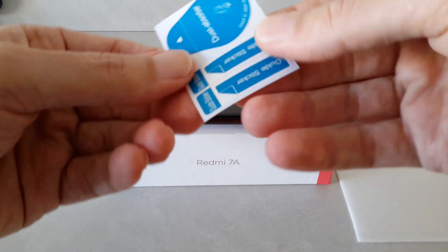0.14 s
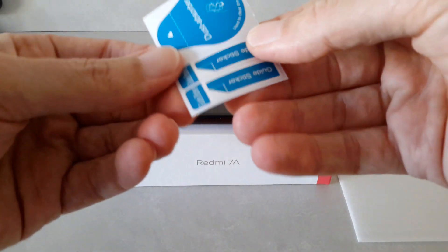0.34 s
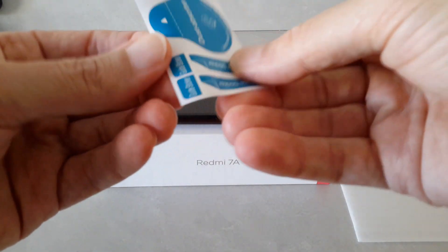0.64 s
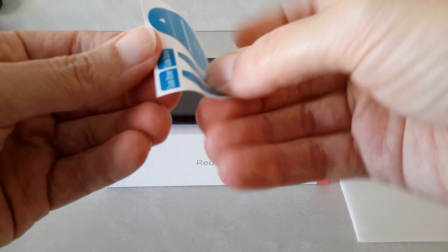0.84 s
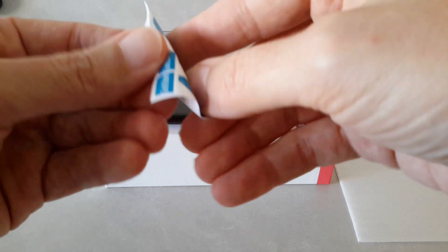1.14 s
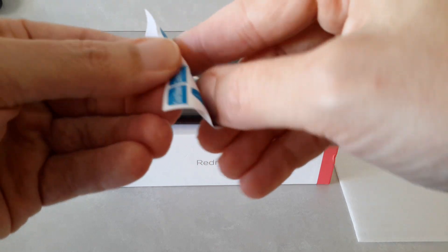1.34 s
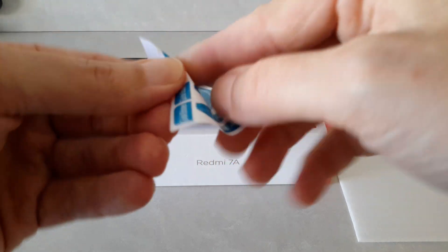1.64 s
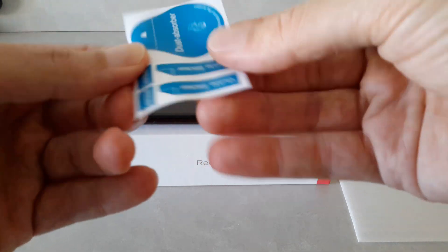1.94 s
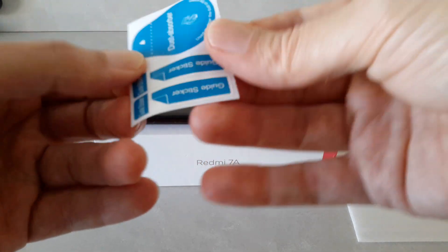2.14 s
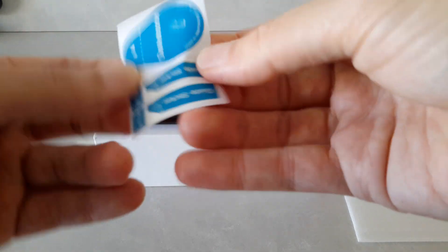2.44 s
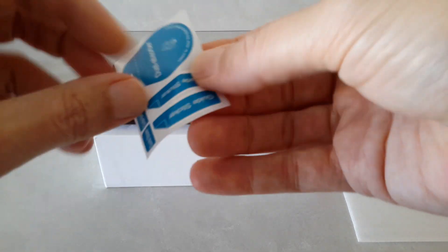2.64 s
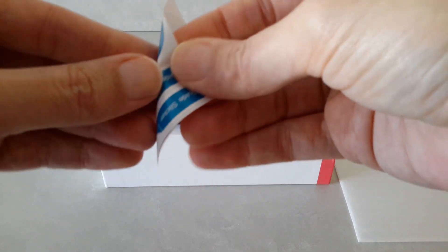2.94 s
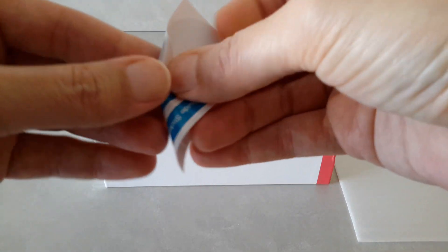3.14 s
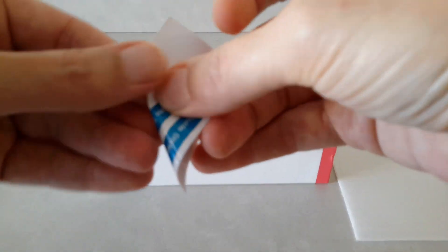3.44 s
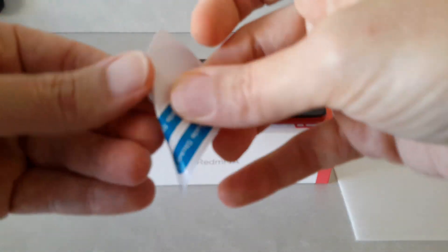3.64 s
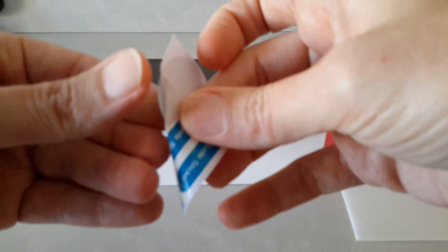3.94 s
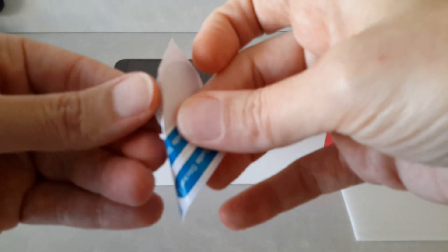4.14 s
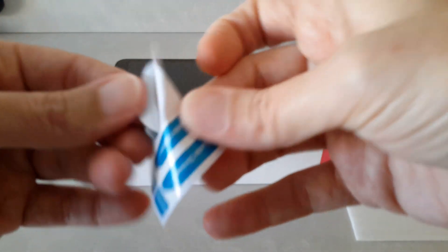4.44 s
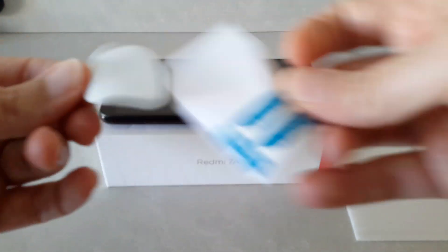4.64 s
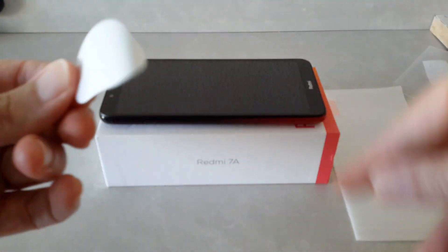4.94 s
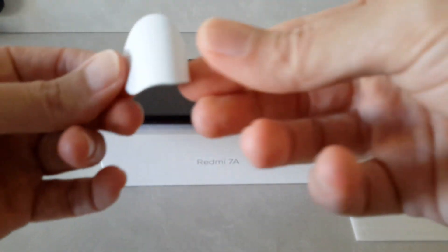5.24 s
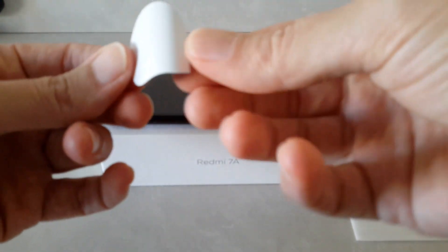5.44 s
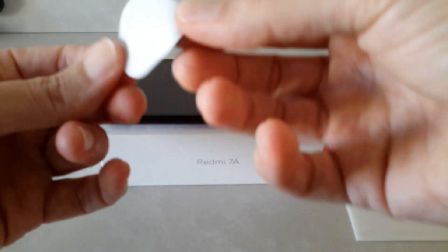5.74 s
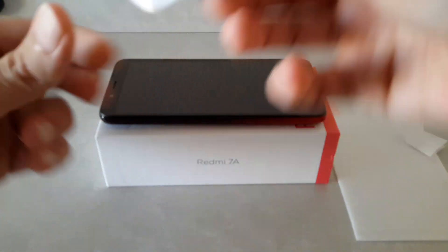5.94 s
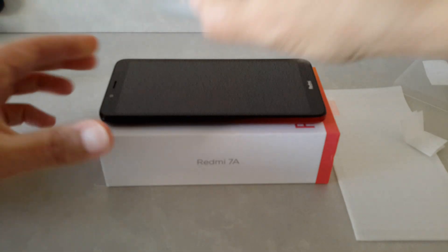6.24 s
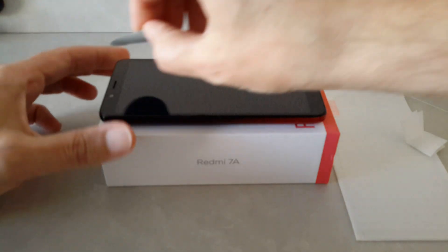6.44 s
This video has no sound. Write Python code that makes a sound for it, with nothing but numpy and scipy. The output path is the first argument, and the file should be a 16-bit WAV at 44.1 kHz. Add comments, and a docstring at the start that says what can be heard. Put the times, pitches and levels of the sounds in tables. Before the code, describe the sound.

Fingers rub and flex a small stiff sticker sheet with faint rustles and crisp ticks over a low fan drone, then one hard snap echoes.

```python
"""From the start a fan drones in the low resonances of a bare, echoing room, over soft microphone hiss
and an uneven low rumble, whose upper boom is stronger near the end.
Soon skin rubs a sticker sheet near the microphone: jerky noise that swells and fades with each stroke.
Fingertips tap softly (one short fading tone each), then bending creases tick: a jolt and a dying flurry.
About five seconds in, something small and hard snaps once on the table: many fading tones and a crack.
The rubbing, taps, ticks and snap also echo from the room."""
import sys
import numpy as np
from scipy import signal
from scipy.fft import rfft, irfft, next_fast_len
from scipy.io import wavfile
from scipy.ndimage import map_coordinates

SR = 44100
rng = np.random.default_rng(int(sys.argv[2]) if len(sys.argv) > 2 else 0)


def log_audio(samples):
    """Write samples as a 16-bit WAV file to the path given in sys.argv[1]."""
    # one column per channel
    frames = np.atleast_2d(samples).T
    # limit to full scale, then quantise
    limited = np.clip(frames, -1, 1)
    pcm = np.round(limited * 32767).astype(np.int16)
    wavfile.write(sys.argv[1], SR, pcm)


N = 290568

# Tone colour of the steady background noise, low fan air and microphone hiss:
# (frequency [Hz], level per Hz [dB])
STEADY_NOISE_COLOUR = [(70, -28.5), (150, -8.5), (300, -1.5), (450, -4), (700, -6), (1250, -11.5),
                       (1800, -19), (2600, -25), (3500, -28), (5000, -31), (6500, -40), (8500, -42),
                       (15800, -44.5)]
# Low room resonances that drone with the fan: (frequency [Hz], width [Hz], level [dB])
DRONE_RESONANCES = [(48, 14, -24), (110, 50, -13.5), (195.5, 40, -8), (234.3, 19, -5.5), (269.6, 29, -7.5),
                    (292.3, 34, -8), (336.6, 22, -8.5), (382, 37, -15.5), (470, 74, -20.5)]
# Steady fan and motor tones: (frequency [Hz], peak level [dB])
HUM_TONES = [(268.5, -57), (578, -67)]
# Rough levels of the low rumble: (time [s], upper boom level [dB], deep boom level [dB])
RUMBLE_LEVELS = [(0.0, -63.5, -79), (0.8, -65, -69), (4.0, -64.5, -73.5), (4.8, -62.5, -71),
                 (5.14, -52.5, -70), (5.35, -63, -65), (6.0, -58, -69), (6.35, -62, -66),
                 (6.59, -54, -66.5)]

# Skin strokes: (middle [s], length [s], level [dB], dull scrape relative to the stroke [dB])
STROKES = [(.14, .078, -75.5, -16), (.385, .12, -75.5, -14), (0.762, .064, -73.5, -12),
           (0.89, 0.12, -70, -20), (1.158, 0.048, -75.5, -8), (1.602, .061, -77, 6),
           (1.76, .095, -70.5, -7), (1.866, 0.13, -63, -13), (1.964, 0.049, -60, 0), (2.301, .07, -64.5, 7),
           (2.44, 0.42, -74, 4), (2.626, .1, -69.5, 4), (2.856, .068, -71.5, -4), (3.0, .1, -74, -15),
           (3.09, 0.088, -69.5, -16), (3.18, .097, -69, -12), (3.255, .14, -67, -16),
           (3.379, .045, -67, -2), (3.47, .17, -77, -6), (3.622, .077, -72.5, 5.5),
           (3.824, 0.054, -62.5, -1), (4.354, .047, -76.5, -3), (4.738, 0.08, -71, 2),
           (4.812, 0.11, -63.5, 5.5), (4.97, 0.31, -67.5, 5), (6.06, 0.055, -63, 0), (6.4, .36, -77, 7.5)]
# Tone colour of skin on paper: (frequency [Hz], level [dB])
PAPER_COLOUR = [(2200, -27), (3300, -11), (3900, -7.5), (4500, -2.5), (5100, -2), (5700, -5), (6500, -10),
                (7200, -18), (9000, -52.5)]
# Tone colour of the thin hiss in a stroke: (frequency [Hz], level [dB])
HISS_COLOUR = [(5000, -36.5), (7500, 1), (10000, -8.5), (12500, -10), (15500, -21)]
# Tone colour of the dull scrape in a stroke: (frequency [Hz], level [dB])
DULL_COLOUR = [(500, -41), (900, 3.5), (1600, -2.5), (2800, -10), (4000, -28), (8000, -51)]
# Hiss relative to the stroke [dB], and its change per dB of dull scrape: the duller, the less hiss
HISS_DB, HISS_PER_DULL = -19, -0.35

# Fingertip taps: (time [s], level [dB], frequency [Hz])
KNOCKS = [(.131, -46.5, 800), (2.228, -49, 705), (2.246, -35, 930), (2.292, -43, 910), (3.257, -52.5, 2050),
          (4.777, -43.5, 975), (5.358, -45.5, 2076), (6.052, -44.5, 2010)]
KNOCK_T60_S = 0.025  # time to fade by 60 dB

# How long the room echoes at each pitch: (frequency [Hz], time to fade by 60 dB [s])
ROOM_FADE = [(500, 1.3), (2000, 1.08), (4000, 0.96), (6000, 0.83), (11000, 0.58), (16000, 0.61)]

# Creases: (time [s], level [dB], ring [Hz], flurry fade by 60 dB [s], echo relative to the crease [dB])
CREASES = [(1.4482, -45.5, 2100, 0.0079, 1), (1.9565, -44, 4730, .03, -5), (2.08, -49, 4330, .009, 13),
           (2.1021, -35.5, 4220, 0.0071, -3), (2.2298, -46.5, 1900, .012, 9),
           (2.2488, -45.5, 2580, .02, -4), (2.307, -49, 4900, .03, -6), (2.6194, -59, 5120, .02, 0),
           (2.64, -50.5, 3000, .008, -4), (3.258, -51, 5150, .018, -3), (3.6418, -38.5, 4900, .024, 6.5),
           (3.8692, -40, 5000, .014, 2), (4.46, -45, 2470, .006, -5.5), (4.707, -55.5, 5540, .014, -4),
           (4.7327, -55.5, 5400, .014, -4), (4.8196, -42, 5000, .05, -5), (4.995, -41.5, 5150, .03, 4),
           (5.0053, -45, 3480, .025, -8), (5.9628, -59, 4500, .02, -4), (6.0525, -40, 4900, 0.019, 5.5),
           (6.0574, -41.5, 4430, .02, -6)]
# Tone colour of the thin edge on each crease: (frequency [Hz], level [dB])
EDGE_COLOUR = [(5000, -20), (7500, 11), (11000, 1.5), (13500, -19), (15800, -17.5)]
# Tone colour of the creases as the walls hear them: (frequency [Hz], level [dB])
CREASE_ECHO_COLOUR = [(800, -34), (2000, -17), (3300, -7), (3900, -7.5), (4500, -1), (5100, 2.5),
                      (5700, -4), (6500, -9.5), (7200, -15), (10000, -24), (15800, -37)]
CREASE_WIDTH_HZ = 1150  # a wider ring fades faster
FLURRY_DB, FLURRY_RISE_S = -13.5, 0.0008  # flurry relative to the jolt, and its build-up time
# Edge relative to the jolt; it weakens for each halving of the flurry's fade time below CRISP_S
EDGE_DB, EDGE_DB_PER_HALVING, CRISP_S = -10, 19, 0.018

# The one hard snap: (time [s], ring level [dB], echo level [dB])
SNAP = (5.0574, -10.5, -0.82)
# Tones the hard object rings with: (frequency [Hz], level [dB], time to fade by 60 dB [s])
SNAP_MODES = [(346, -24, 0.046), (480, -21, 0.021), (960, -21.5, 0.024), (1310, -15.5, 0.017),
              (2095, -16, 0.018), (2430, -9.5, 0.012), (3480, 1.5, 0.011), (4200, -4, 0.013),
              (5010, 0.5, 0.011), (5980, -2, 0.012), (7200, -13.5, 0.0085)]
# Tone colour of the snap's crack: (frequency [Hz], level [dB])
CRACK_COLOUR = [(3000, -24), (7000, 0), (9000, 1.5), (11500, -5.5), (14000, -18), (15800, -18)]
# Near surfaces that repeat the snap: (delay after the snap's time [s], level [dB])
NEAR_WALLS = [(.0033, -11.5), (0.0102, -20), (0.0138, -17), (.0227, -26.5), (0.0365, -24)]
# Tone colour of the snap as the walls hear it: (frequency [Hz], level [dB])
SNAP_ECHO_COLOUR = [(300, -40), (570, -14), (750, -5), (1200, -4.5), (1800, -8.5), (2060, -2.5), (2400, -5),
                    (3500, -0.5), (4970, 2), (6200, -4), (7500, -10), (10200, -17.5), (13000, -33.5),
                    (15800, -51)]

TOP_HZ = 15750  # the recorder keeps nothing from here up


def amp(db):
    """Turns decibels into a plain multiplier."""
    return 10 ** (np.asarray(db) / 20)


def unit(x):
    """Scales a sound to an average (rms) strength of 1."""
    return x / np.sqrt(np.mean(x ** 2) + 1e-20)


def along(points, hz):
    """Reads a value between (frequency, value) points, with pitch on a log scale."""
    f, v = np.transpose(points)
    return np.interp(np.log(hz + 1), np.log(f + 1), v)


def curves(rows):
    """Draws one curve over time for each column after the time."""
    s, *cols = np.transpose(rows)
    return [np.interp(np.arange(N) / SR, s, c) for c in cols]


def wobble(rate):
    """A smooth random curve through `rate` random points a second."""
    knots = rng.standard_normal(N // 100)
    return map_coordinates(knots, [np.arange(N) * rate / SR])


def filtered(x, response):
    """Makes each frequency of a sound louder or softer, as `response` says."""
    m = next_fast_len(N + SR // 2)  # spare room at the end
    hz = np.fft.rfftfreq(m, 1 / SR)
    return irfft(rfft(x, m) * response(hz), m)[:N]


def coloured(x, spectrum):
    """Gives a sound the tone colour of a (frequency, level) table, at rms 1."""
    return unit(filtered(x, lambda hz: amp(along(spectrum, hz))))


def resonant(modes):
    """Noise gathered in resonances whose sides fall off steeply, at rms 1."""
    def response(f):
        power = sum(amp(2 * db) / (1 + (2 * (f - hz) / width) ** 2) ** 2 for hz, width, db in modes)
        return np.sqrt(power)
    return unit(filtered(rng.standard_normal(N), response))


def add(out, s, sound):
    """Mixes a sound in, starting at s seconds."""
    part = out[round(s * SR):][:len(sound)]
    part += sound[:len(part)]


def background():
    """Low fan air and microphone hiss, the fan's drone and wavering tones, and an uneven low rumble."""
    boom_db, deep_db = curves(RUMBLE_LEVELS)
    steady_noise = coloured(rng.standard_normal(N), STEADY_NOISE_COLOUR)
    air_and_hiss = amp(-56.5 + 0.95 * wobble(3.276)) * steady_noise
    drone = amp(-54.5 + 0.72 * wobble(1.53)) * resonant(DRONE_RESONANCES)
    hum = np.zeros(N)
    for hz, db in HUM_TONES:
        level = amp(db + 1.2 * wobble(6.8))
        turns = np.cumsum(hz + 0.83 * wobble(5)) / SR
        hum += level * np.sin(2 * np.pi * turns)
    upper_boom = amp(boom_db + 1.5 * wobble(4)) * resonant([(153.0, 31, 0)])
    deep_boom = amp(deep_db) * resonant([(48, 13, 0)])
    return air_and_hiss + drone + hum + upper_boom + deep_boom


def jerks():
    """Noise of random, uneven strength: skin catching and slipping in tiny jerks."""
    bursts_db = 2 * np.minimum(rng.exponential(size=N), 4)
    return rng.standard_normal(N) * amp(bursts_db + 1.3 * wobble(120))


def rubbing():
    """Skin slips over the fibres in tiny jerks; each stroke swells and fades."""
    pressure = np.zeros((3, N))  # paper, hiss, dull scrape
    for s, length, db, dull_db in STROKES:
        swell = np.hanning(round(length * SR)) ** 0.67
        hiss_db = HISS_DB + HISS_PER_DULL * dull_db
        for row, level in zip(pressure, amp(db + np.array([0, hiss_db, dull_db]))):
            add(row, s - length / 2, level * swell)
    colours = (PAPER_COLOUR, HISS_COLOUR, DULL_COLOUR)
    return sum(row * coloured(jerks(), colour) for row, colour in zip(pressure, colours))


def knocks():
    """Soft fingertip taps: each is one tone that starts quickly and fades."""
    out = np.zeros(N)
    t = np.arange(SR // 8) / SR
    for s, db, hz in KNOCKS:
        start = 1 - np.exp(-t / 0.0003)
        add(out, s, amp(db - 60 * t / KNOCK_T60_S) * start * np.sin(2 * np.pi * hz * t))
    return out


def room(x, colour):
    """The echo builds over some 30 ms, then each frequency dies at its own speed."""
    hz, t, noise = signal.stft(rng.standard_normal(SR), SR, nperseg=256)
    build = 1 - np.exp(-(t / 0.019) ** 2)
    fade_db = 60 * t / along(ROOM_FADE, hz)[:, None]
    shape = amp(along(colour, hz)[:, None] - fade_db) * build
    tail = signal.istft(noise * shape, SR, nperseg=256)[1]
    return signal.fftconvolve(x, tail / np.linalg.norm(tail))[:N]


def ticks():
    """A crease lets go in one jolt and a dying flurry of smaller ones, each a fading ring."""
    out, edges, blows = np.zeros(N), np.zeros(N), np.zeros(N)
    t = np.arange(SR // 20) / SR
    fade = np.pi * CREASE_WIDTH_HZ * t
    envelope = (fade * np.exp(1 - fade)) ** 2  # a soft start keeps the ring's pitch well gathered
    for s, db, hz, t60, echo_db in CREASES:
        build = 1 - np.exp(-t / FLURRY_RISE_S)
        jolts = rng.standard_normal(len(t)) * amp(FLURRY_DB - 60 * t / t60) * build
        jolts[0] = 1  # the first, main jolt
        ring = np.sin(2 * np.pi * hz * t) * envelope
        add(out, s, amp(db) * signal.fftconvolve(jolts, ring))
        # Short flurries are blunt: their thin edge is weaker
        edge_db = EDGE_DB + EDGE_DB_PER_HALVING * min(np.log2(t60 / CRISP_S), 0)
        add(edges, s, amp(db + edge_db) * jolts)
        blows[round(s * SR)] = amp(db + echo_db) * np.linalg.norm(jolts)
    thin_edges = filtered(edges, lambda f: amp(along(EDGE_COLOUR, f)))
    return out + thin_edges + room(blows, CREASE_ECHO_COLOUR)


def snap():
    """A hard blow rings all modes and cracks, near surfaces repeat it, the room answers smoothly."""
    out, blow = np.zeros(N), np.zeros(N)
    t = np.arange(SR // 10) / SR
    s, db, echo_db = SNAP
    ring = sum(amp(level - 60 * t / t60) * np.sin(2 * np.pi * hz * t) for hz, level, t60 in SNAP_MODES)
    crack_noise = coloured(rng.standard_normal(N), CRACK_COLOUR)[:len(t)]
    crack = amp(-20.5 - 60 * t / 0.019) * crack_noise
    start = 1 - np.exp(-(t / 0.00026) ** 2)
    hit = amp(db) * (ring + crack) * start
    for delay, wall_db in [(0.0011, 0)] + NEAR_WALLS:  # the direct sound comes first
        add(out, s + delay, amp(wall_db) * hit)
    blow[round(s * SR)] = amp(echo_db)
    return out + room(blow, SNAP_ECHO_COLOUR)


def scene():
    """Paper, taps and snap near the microphone, with the room and steady background behind."""
    skin, taps = rubbing(), knocks()
    echo_colour = [(500, -8.5), (3000, 7), (16000, 2)]  # (frequency [Hz], level [dB])
    echo = room(amp(-5.0) * skin + amp(-11.0) * taps, echo_colour)
    return (skin + taps + echo + ticks() + snap() + background())[None]


def record(dry):
    """The recorder cuts deep bass, keeps nothing above its band limit and sits slightly off zero."""
    def response(hz):
        bass_cut = 1 / np.sqrt(1 + (36 / (hz + 1)) ** 8)
        return (hz < TOP_HZ) * bass_cut
    return filtered(dry[0], response)[None] - 0.0006


dry = scene()
out = record(dry)
log_audio(out)
```